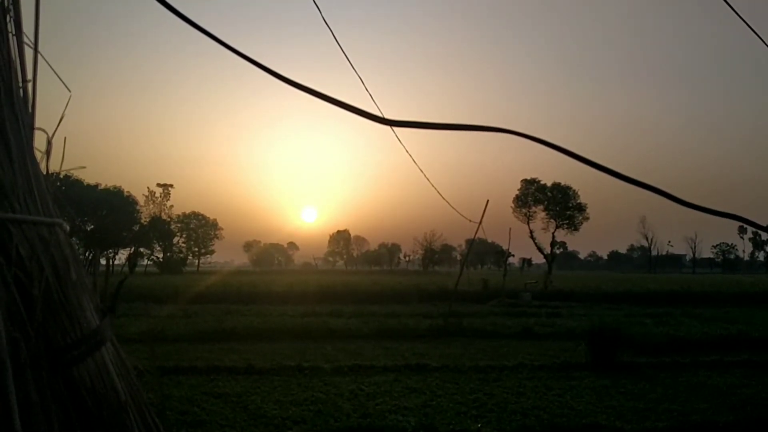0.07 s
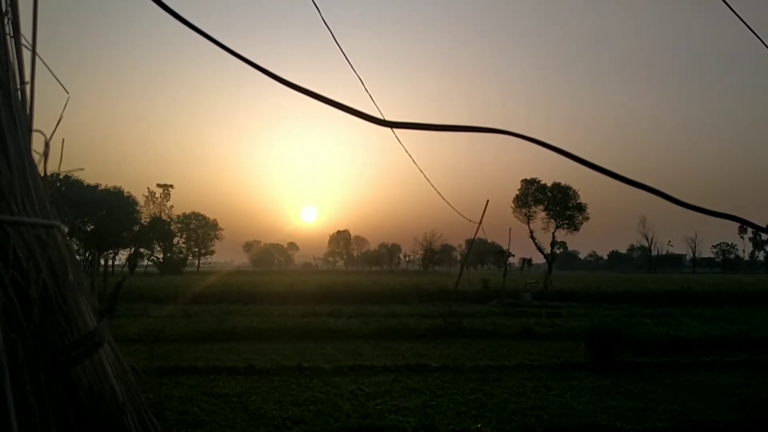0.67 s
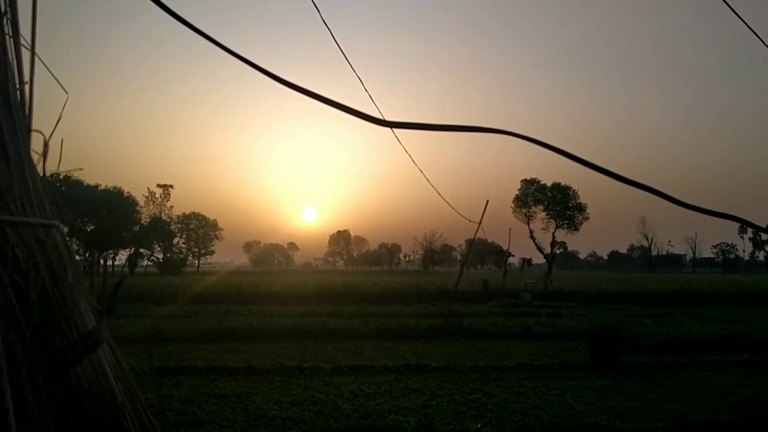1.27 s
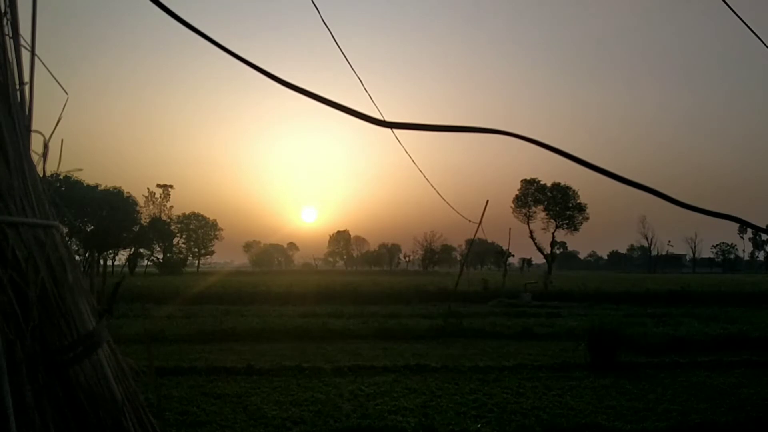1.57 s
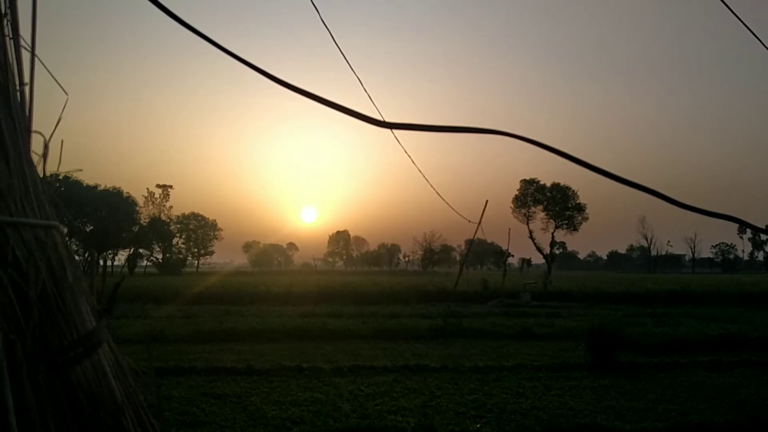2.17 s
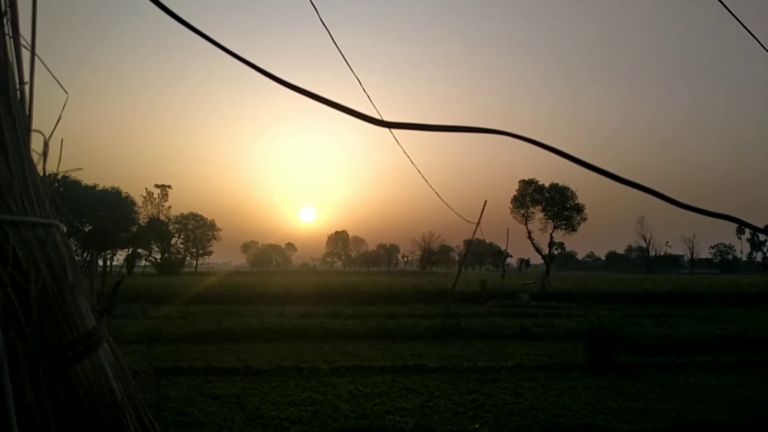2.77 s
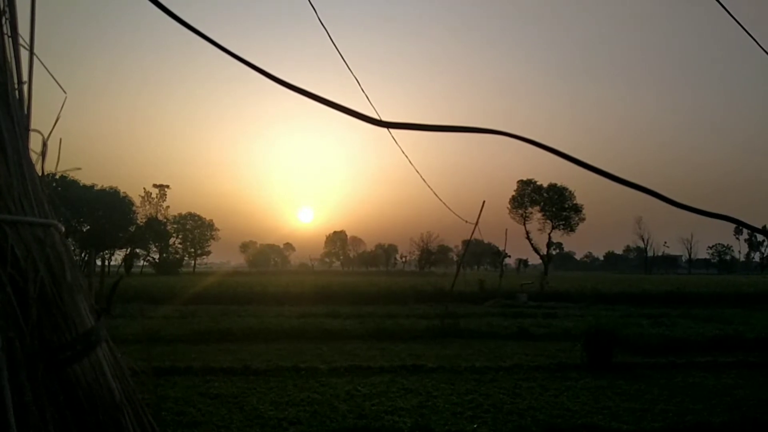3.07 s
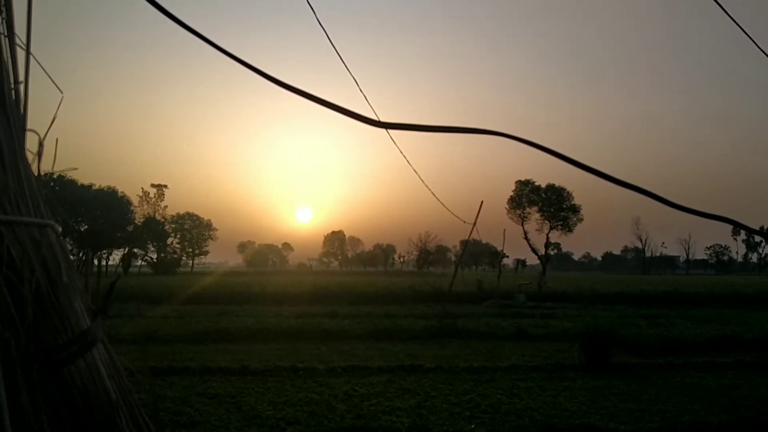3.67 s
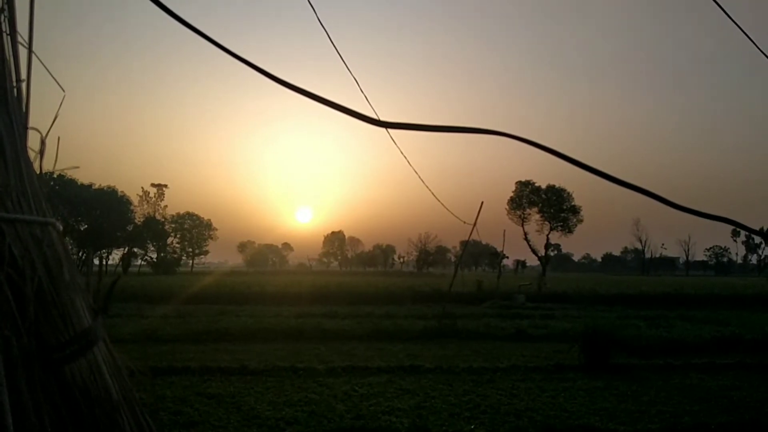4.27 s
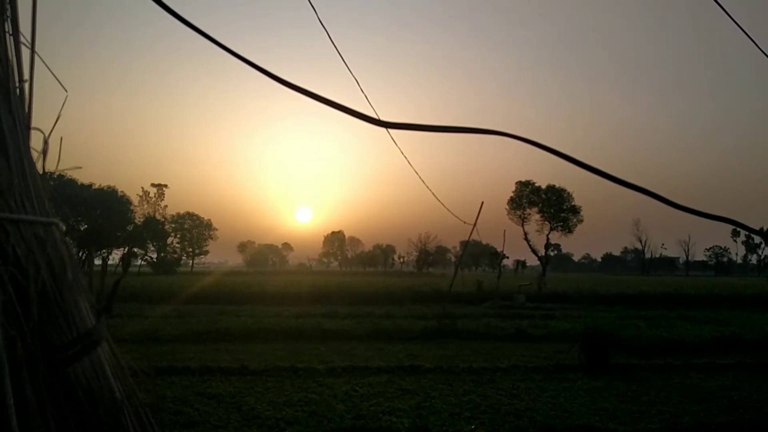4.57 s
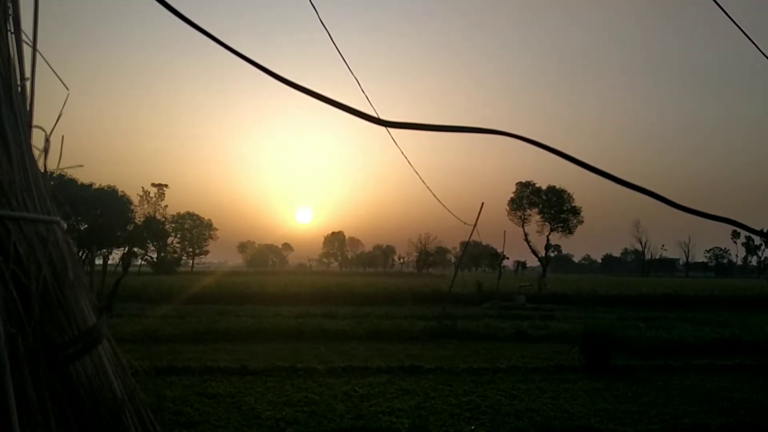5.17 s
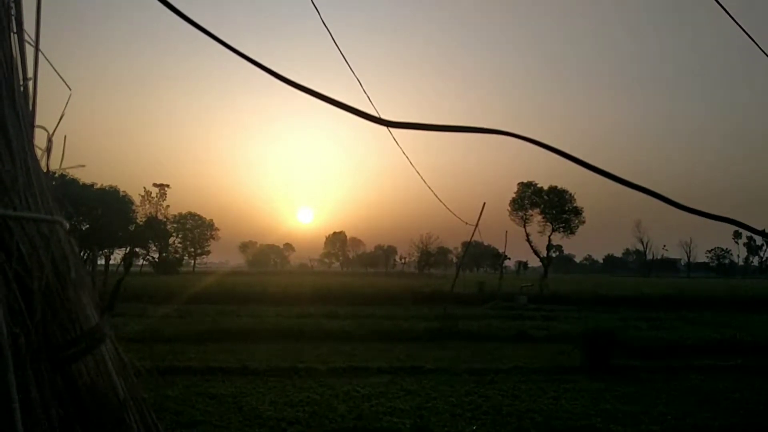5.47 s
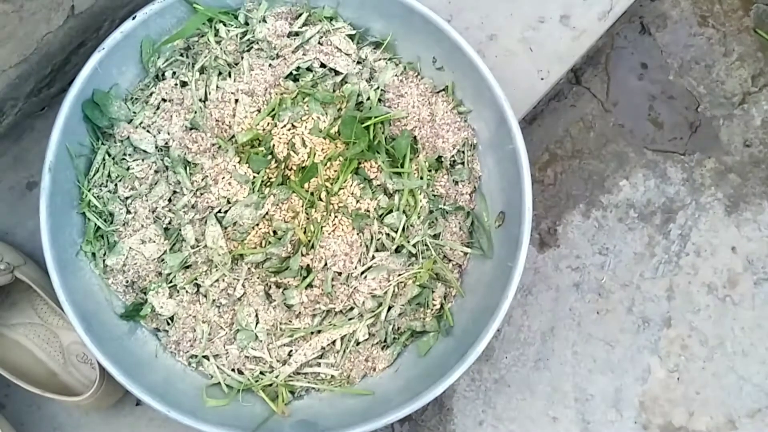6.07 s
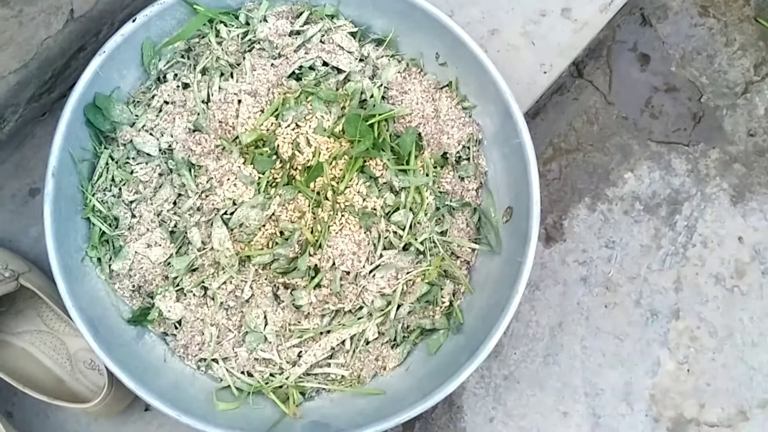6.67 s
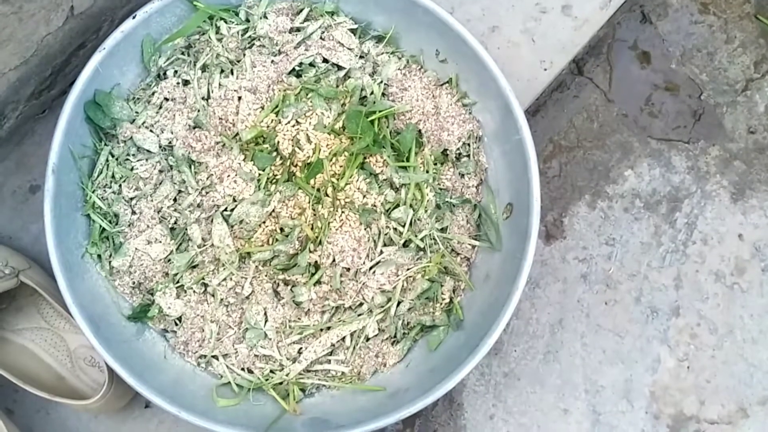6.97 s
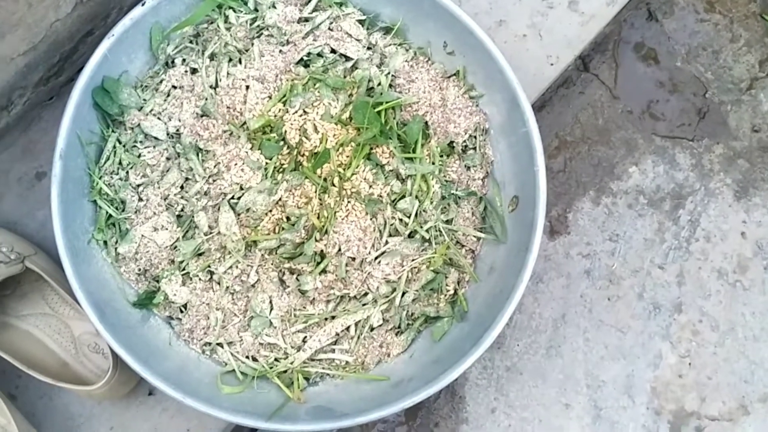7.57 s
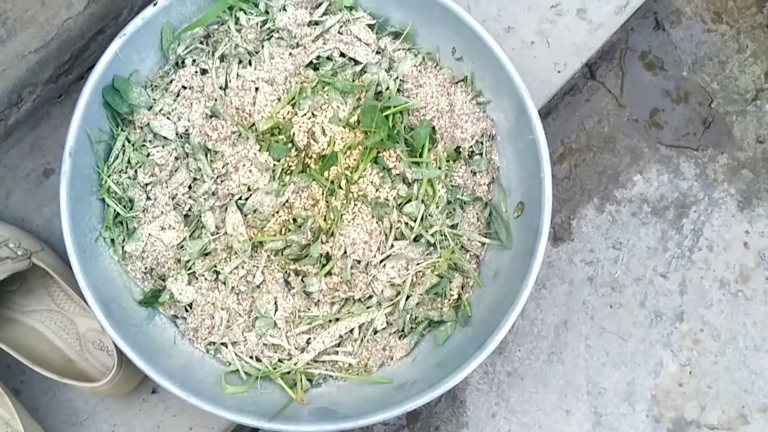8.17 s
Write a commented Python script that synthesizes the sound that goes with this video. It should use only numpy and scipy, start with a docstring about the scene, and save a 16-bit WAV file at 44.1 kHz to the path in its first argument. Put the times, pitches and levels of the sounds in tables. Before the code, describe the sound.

Birdsong and far crow caws in open air give way to close rustling of dry fibres and one loud scrape.

```python
"""Dawn over farmland: small birds whistle, chirp, pip and trill, mostly left of the microphone, while
crows caw far off over open air and a low rumble. From two seconds in come short swells of breathy hiss.
After a short silence the microphone stands in a yard, beside a basin of fodder: dry fibres slip and
buckle in soft rustles and one loud, close scrape, and a last crow calls in the distance.
Single ticks and bumps dot both places."""
import sys
import numpy as np
from scipy import signal
from scipy.fft import rfft, irfft, next_fast_len
from scipy.io import wavfile
from scipy.ndimage import uniform_filter1d

SR = 44100
rng = np.random.default_rng(int(sys.argv[2]) if len(sys.argv) > 2 else 0)


def transcribe(signal):
    """Save signal, clipped to [-1, 1], as a 16-bit WAV file at the path in sys.argv[1]."""
    frames = np.atleast_2d(signal).T
    limited = np.clip(frames, -1, 1)
    pcm = np.round(limited * 32767).astype(np.int16)
    wavfile.write(sys.argv[1], SR, pcm)


N = 371322
TIME = np.arange(N) / SR
FIELD_END_S, YARD_START_S = 5.33, 5.555
TOP_HZ = 15900


def whistles(waver=.004, flutter_db=0.5):
    """Clean gliding whistles from the left; the open beak lets overtones out."""
    # One list a whistle. Each row: time in seconds, pitch in Hz, levels of harmonics 1, 2 and 3 in dB.
    contours = [
        [(2.025, 2474, -62, -83.5, -95), (2.055, 2683, -51, -85, -90), (2.13, 2830, -46, -54, -83),
         (2.22, 3010, -58, -61, -96)],
        [(3.565, 2782, -41.5, -54, -51), (3.62, 2752, -41.5, -42.5, -39), (3.665, 2709, -38, -53.5, -34.5),
         (3.7, 2430, -39, -57.5, -53), (3.742, 2150, -49, -75, -80.5)],
        [(4.248, 2070, -47, -79, -68), (4.278, 2410, -50, -75, -74), (4.335, 2493, -47, -82.5, -71),
         (4.415, 2800, -43, -81, -83), (4.45, 2921, -43.5, -65, -83), (4.47, 2810, -50.5, -69.5, -85)],
        [(4.968, 2714, -57, -60, -65), (4.998, 3130, -46, -53.5, -66.5), (5.028, 3270, -36.5, -48, -69.5),
         (5.06, 3223, -46.5, -55.5, -71)],
    ]
    # Where each whistler sits. Each row: left minus right in dB, lag of the left ear in ms.
    perches = [(9.5, 0.26), (4.5, -.25), (10.5, -0.07), (10.5, -.02)]
    out = np.zeros((2, N))
    for contour, (pan_db, lag_ms) in zip(contours, perches):
        start, end = contour[0][0], contour[-1][0]
        t = start + clock(end - start)
        hz, *levels = curves(contour, t)
        phase = turn(hz * (1 + waver * wander(t, 300)))
        tone = sum(undb(db + flutter_db * wander(t, 120)) * np.sin(k * phase)
                   for k, db in enumerate(levels, 1))
        add(out, start, np.sqrt(2) * tone * signal.windows.tukey(len(t), .15), pan_db, lag_ms)
    return out


def chirp(length, hz, bend, rasp, taper=0.51, rasp_hz=330, rasp_db=5, overtone_db=-21):
    """One chirp bends from hz * bend[0] through hz to hz * bend[1]; rasp shakes its pitch and level."""
    t = clock(length)
    arc = np.polyfit([0, .5, 1], [bend[0], 1, bend[1]], 2)
    phase = turn(hz * np.polyval(arc, t / t[-1]) + rasp * rasp_hz * wander(t, 900))
    overtone = undb(overtone_db) / (1 + (hz / 4500) ** 8)  # the beak passes little treble
    tone = np.sin(phase) + overtone * np.sin(2 * phase)
    shake = undb(rasp * rasp_db * wander(t, 400))
    return unit(tone * shake) * signal.windows.tukey(len(t), taper)


def chirps():
    """Short calls around the field; each kind keeps its own shape."""
    # One bird's thin, high arches. Each row: start and length in seconds, level and left minus right in dB.
    tsees = [(0.092, 0.097, -66, 1), (0.69, 0.024, -66, -4), (1.059, 0.089, -63, 5),
             (1.179, 0.032, -62.5, -1), (1.759, 0.077, -65, 11.5), (2.206, 0.088, -59, 5.5),
             (3.39, 0.078, -54, 1.5)]
    # Clean, round arches. Each row: start and length in seconds, top pitch in Hz,
    # level and left minus right in dB.
    arches = [(3.574, .06, 4530, -52, 8), (3.724, 0.056, 4520, -59, 15), (4.987, .065, 4010, -48, 14.5)]
    # Harsh downward swoops. Each row: start and length in seconds, level in dB.
    swoops = [(3.532, 0.088, -47), (3.938, .125, -49.5)]
    # Other birds' plain slurs. Each row: start and length in seconds, pitch in Hz, glide in octaves,
    # level in dB, rasp from 0 to 1, left minus right in dB.
    slurs = [(.55, 0.093, 2240, -0.1, -72, .1, 2), (0.804, 0.15, 2090, -0.38, -76.5, 0.16, -1),
             (0.919, 0.124, 2004, .14, -69, 0.16, 6), (1.671, 0.096, 2880, -0.28, -64.5, 0.52, 13.5),
             (1.938, .018, 2170, -0.47, -65, 0.15, 1), (2.274, 0.077, 3094, -0.02, -52, 0.5, 6),
             (2.7, 0.032, 3250, 0, -60.5, 0.16, 7.5), (2.718, 0.03, 4220, -0.42, -58.5, 0.81, 15),
             (2.928, .096, 2840, 0, -67, 0.09, 8.5), (3.352, 0.058, 2830, 0, -46.5, .6, 7),
             (3.39, 0.12, 2700, 0.33, -52.5, 1, 6), (3.765, 0.13, 4420, 0, -62, 0.18, 11),
             (3.905, 0.054, 4674, 1.7, -50, 0.99, 5.5), (3.965, 0.0527, 7600, -.2, -53, .9, 4.5),
             (4.085, 0.22, 3684, 0.25, -59.5, 0.18, 5), (4.848, 0.12, 2050, .1, -63.5, 0.27, 8),
             (5.046, .07, 2885, -0.24, -50.5, .4, 11), (5.096, 0.031, 2528, -0.55, -52.5, 0.45, 10)]
    out = np.zeros((2, N))
    for start, length, db, pan_db in tsees:
        add(out, start, undb(db) * chirp(length, hz=6280, bend=(.78, .89), rasp=.75), pan_db)
    for start, length, hz, db, pan_db in arches:
        add(out, start, undb(db) * chirp(length, hz, bend=(.68, .7), rasp=.1), pan_db)
    for start, length, db in swoops:
        add(out, start, undb(db) * chirp(length, hz=3730, bend=(2.1, .62), rasp=1.1), pan_db=8)
    for start, length, hz, glide, db, rasp, pan_db in slurs:
        bend = 2 ** (-glide / 2), 2 ** (glide / 2)
        add(out, start, undb(db) * chirp(length, hz, bend, rasp), pan_db)
    return out


def trills(overtone_db=-15, flutter_db=3.5, settle_power=2.5):
    """Chains of arched syllables; as the bird's effort ebbs they slow down and fall in pitch."""
    # Each row: start, length and settling time in seconds, first and last syllables per second,
    # first and last low note in Hz, arch height in Hz, place of the crest in a syllable from 0 to 1,
    # crest against low note in dB, level in dB, fade in dB per second, left minus right in dB.
    chains = [(4.466, .385, .085, 59.3, 26.63, 6490, 2976, 1076, 0.75, -6.5, -34.5, 21, 6.2),
              (5.2603, 0.067, 0.03, 113, 101.2, 3575, 2806, 1840, 0.5, 5, -44.5, -23, 6.7)]
    out = np.zeros((2, N))
    for (start, length, settle, first_rate, last_rate, first_hz, last_hz,
         arch_hz, crest, crest_db, db, fade_db, pan_db) in chains:
        t = clock(length)
        effort = 1 / (1 + (t / settle) ** settle_power)
        cycle = np.cumsum(last_rate + (first_rate - last_rate) * effort) / SR % 1
        ramp = np.interp(cycle, [0, np.clip(crest, .2, .9), 1], [0, 1, 0])
        arch = np.sin(np.pi / 2 * ramp) ** 2
        hz = last_hz + (first_hz - last_hz) * effort + arch_hz * arch
        phase = turn(hz * (1 + .012 * wander(t, 900)))
        overtone = undb(overtone_db) / (1 + (hz / 4200) ** 20)  # the beak passes little treble
        tone = unit(np.sin(phase) + overtone * np.sin(2 * phase))
        loudness = undb(db - fade_db * t + crest_db * arch + flutter_db * wander(t, 550))
        add(out, start, tone * loudness * signal.windows.tukey(len(t), .04), pan_db, lag_ms=-.09)
    return out


def pips(pan_db=11.5, duty=.72, swell_db=8):
    """Quick runs of evenly spaced little hooks, loudest in the middle of a run."""
    # Each row: start and length in seconds, pips per second, pitch in Hz, climb over the run in octaves,
    # start and end of a pip as shares of its pitch, mid-run level in dB.
    runs = [(3.174, .21, 28.55, 2840, 0.0082, 0.87, 0.8, -46.5),
            (3.311, .18, 66.6, 2075, 0.3, 0.93, 0.97, -48.5),
            (3.836, 0.19, 30.85, 3070, 0, .78, 0.99, -45.5)]
    out = np.zeros((2, N))
    for start, length, rate, hz, climb, first, last, db in runs:
        for k, place in enumerate(np.linspace(-1, 1, round(length * rate))):
            pip = chirp(duty / rate, hz * 2 ** (climb * place / 2), (first, last), rasp=.088, taper=.41)
            add(out, start + k / rate, undb(db - swell_db * place ** 2) * pip, pan_db)
    return out


def rustles(catch_db=1.0, crackle_db=-13, low_air_db=-50, low_air_growth=0.21):
    """Handled fibres slip: a bright, crackly rustle, and a duller scrape when pressed hard."""
    # Each row: start, rise, hold and fade to -60 dB in seconds, level in dB, scrape against it in dB.
    strokes = [(5.705, 0.0058, 0.049, 0.36, -46.5, -6.5), (5.84, 0.006, 0.087, 0.28, -54.5, -3),
               (6.037, 0.066, 0.0085, 0.21, -57.5, -3), (6.108, 0.0021, 0.031, 0.17, -46.5, -10.5),
               (6.24, 0.0137, 0.0095, 0.25, -70, -6), (6.414, 0.013, 0.0045, 0.08, -31, -1),
               (6.431, 0.0073, .02, 1.1342, -40, -12), (6.525, 0.0037, 0.03, 0.65, -36, -11),
               (6.552, 0.03355, 0.021, 0.1537, -18.5, 0), (6.635, 0.062, 0.045, 0.2782, -34.5, -17),
               (6.869, 0.012, .019, 0.57, -61.5, -1.5), (7.103, 0.00595, 0.024, 0.25, -53, -7),
               (7.211, 0.00386, 0.0072, 0.13, -57, -16), (7.315, 0.03, 0.045, 0.33, -51.5, -7.5),
               (7.607, 0.0078, .005, 0.33, -59, 2.5), (7.748, 0.012, 0.0136, 0.236, -61.5, -5),
               (7.943, 0.0436, 0.19, 0.4, -57.5, -6), (8.042, .0036, 0.039, 0.08, -50.5, -3.5)]
    # Spectra of rustle, scrape and low air. Each row: frequency in Hz, relative level in dB.
    rustle_colour = [(88, -48.5), (150, -23.5), (341, -16.5), (398, -13), (1120, -14.5), (2400, -8),
                     (3160, -8.5), (3920, -4), (5790, 0), (8560, 1.5), (11500, -10), (14000, -6),
                     (16000, -20)]
    scrape_colour = [(150, -31.5), (500, -13.5), (1000, -7.5), (1400, -2.5), (2200, 0), (3600, 1.5),
                     (5000, -9), (14000, -28.5)]
    low_air_colour = [(25, -9.5), (90, -1), (200, -6), (350, -3), (450, -7.5), (620, -1), (850, -12.5),
                      (1500, -27.5), (4000, -44)]
    bright, dull, low = np.zeros((3, 2, N))
    for start, rise, hold, fade, db, scrape_db in strokes:
        add(bright, start, undb(db) * swell(rise, hold, fade), pan_db=1)
        add(dull, start - .003, undb(db + scrape_db) * swell(rise, hold, fade * 0.93), pan_db=1)
        # Low background air swells up with each rustle, only a little more for a loud one.
        add(low, start, undb(low_air_db + low_air_growth * db) * swell(rise, hold, fade * 1.2), pan_db=.5)
    fibres = grainy_hiss(rustle_colour, rate=3200, spread_db=3.5, smooth=3.7)
    crackle = undb(crackle_db) * crinkles()
    scrape = grainy_hiss(scrape_colour, rate=1500, spread_db=3, smooth=.9)
    catching = undb(catch_db * wander(TIME, 170))
    low_air = low * air(low_air_colour, flicker_db=4.5)
    return (bright * (fibres + crackle) + dull * scrape) * catching + low_air


def swell(rise, hold, fade):
    """A level that builds, holds and dies away."""
    rise, hold, fade = np.maximum([rise, hold, fade], [.001, 0, .03])
    t = clock(rise + hold + fade)
    return np.minimum(t / rise, 1) ** 1.2 * undb(-60 * np.maximum(t - rise - hold, 0) / fade)


def grainy_hiss(points, rate, spread_db, smooth):
    """Countless tiny clicks, a few larger than the rest, over a smooth hiss."""
    clicks = (rng.random(N) < rate / SR) * rng.choice([-1, 1], N)
    clicks = clicks * undb(spread_db * np.minimum(rng.exponential(size=N), 2))
    both = np.array([np.roll(clicks, 20), clicks])  # they reach the right ear first
    return colour(unit(both) + smooth * stereo_noise(), points)


def crinkles(count=1200, low_hz=3000, high_hz=12000, cycles=6):
    """Single fibres buckling: tiny ticks, each with its own pitch, size and direction."""
    out = np.zeros((2, N))
    span = TIME[-1] - .01 - YARD_START_S
    for when, height, size, side in rng.random((count, 4)):
        hz = low_hz * (high_hz / low_hz) ** height
        t = clock(cycles / hz)
        tick = np.sin(2 * np.pi * hz * t) * undb(-60 * t * hz / cycles + 16 * size ** 3)
        add(out, YARD_START_S + when * span, tick, pan_db=6 * side - 2, lag_ms=side - .3)
    return unit(out)


def snaps(cycles=6, width=0.65):
    """Single ticks and soft bumps in both places; the lower ones last longer."""
    # Each row: start in seconds, level in dB, centre in Hz.
    ticks = [(2.183, -40.5, 7000), (4.026, -25.5, 1380), (4.661, -36, 397), (5.244, -38, 401),
             (5.709, -30.5, 6000), (5.846, -34, 2800), (5.893, -37, 6100), (5.969, -37.5, 6100),
             (6.109, -34, 6800), (6.425, -15.5, 2480), (6.523, -20, 7250), (6.569, -12, 2600),
             (6.81, -37.5, 480), (7.216, -38, 6370)]
    out, t = np.zeros((2, N)), clock(.06)
    for start, db, hz in ticks:
        burst = rng.standard_normal((2, len(t)))
        ring = unit(resonate(burst, hz, hz * width))
        add(out, start, undb(db) * ring * undb(-60 * t / (0.0026 + cycles / hz)))
    return out


def hiss_swells(flicker_db=2.5):
    """Short swells of breathy hiss, about four a second; the last one lingers."""
    # Each row: start, rise, hold and fade to -60 dB in seconds, level in dB.
    swells = [(2.048, 0.061, 0.044, 0.42, -49.5), (2.299, 0.0027, 0.0096, 0.36, -45.5),
              (2.539, 0.013, 0.024, 0.39, -45), (2.792, 0.014, 0.0406, 0.26, -42.5),
              (3.083, 0.0045, 0.029, 0.2, -41), (3.354, .02, 0.039, 3.3, -49.5)]
    # Their spectrum. Each row: frequency in Hz, relative level in dB.
    hiss_colour = [(150, -6.5), (490, -17.5), (1100, -3), (1500, -9), (2300, -2.5), (3300, 0), (4400, -9),
                   (7100, -2), (8400, -8), (9600, -61.5), (15000, -26)]
    level = np.zeros((2, N))
    for start, rise, hold, fade, db in swells:
        add(level, start, undb(db) * swell(rise, hold, fade), pan_db=2.2)
    flicker = undb(flicker_db * wander(TIME, 160))
    return level * flicker * grainy_hiss(hiss_colour, rate=3000, spread_db=4, smooth=2.5)


def crows(hoarse=0.0903, throat_hz=1730, throat_width_hz=430, chest_hz=600, between_hz=1130):
    """Far crows: uneven pulses through the throat; distance leaves mostly its nasal resonance."""
    # Each row: start and length in seconds, pitch in Hz, level in dB, weight of the low resonances in dB.
    caws = [(0.154, 0.2, 434, -59.5, -12), (0.606, 0.14, 446, -62, -23), (1.045, 0.21, 426, -61, -12),
            (3.519, 0.15, 565, -53, 4.5), (4.082, 0.17, 455.4, -54.5, -21), (4.494, .2, 567, -49.5, 2.5),
            (4.721, .14, 579, -56.5, 5.5), (7.951, .27, 517, -62.5, -7.5)]
    out = np.zeros((2, N))
    for start, length, hz, db, low_db in caws:
        t = clock(length)
        sag = 1.04 - .08 * t / t[-1] + .025 * wander(t, 40)
        phase = turn(hz * sag * (1 + hoarse * wander(t, 700)))
        pulses = sum(np.cos(k * phase) for k in range(1, 7))
        pulses *= undb(8.3 * np.tanh(wander(t, 600)))
        nasal = resonate(resonate(pulses, throat_hz, throat_width_hz), throat_hz, throat_width_hz)
        low = resonate(pulses, chest_hz, 120) + undb(-3) * resonate(pulses, between_hz, 200)
        caw = unit(nasal + undb(low_db - 2.5) * low) * signal.windows.tukey(len(t), .35)
        add(out, start, undb(db) * caw, pan_db=5, lag_ms=.02)
    return out


def flock(count=260, db=-8, spread_db=3, low_hz=2000, high_hz=6000, slide=0.25):
    """Many faint, far chirps, each with its own pitch, slide and direction."""
    out = np.zeros((2, N))
    for when, height, length, bend, size, side in rng.random((count, 6)):
        t = clock(.012 + 0.046 * length)
        glide = 1 + slide * (2 * bend - 1.3) * t / t[-1]
        hz = low_hz * (high_hz / low_hz) ** (height ** 2) * glide
        tone = np.sin(turn(hz * (1 + 0.043 * wander(t, 700)))) * np.hanning(len(t))
        add(out, when * FIELD_END_S, undb(db + spread_db * (2 * size + 1)) * tone, pan_db=8 * side - 2)
    return out


def outdoors(x, near_db=-7, near_t60=0.22, far_db=-17, far_t60=0.53, echo_db=-13, echo_s=0.011):
    """Ground and walls scatter the calls quickly, trees add a faint long tail."""
    t = clock(.8)
    near, far = (rng.standard_normal((2, len(t))) * undb(-60 * t / t60) * (t > .003)
                 for t60 in (near_t60, far_t60))
    far = signal.lfilter(*signal.butter(2, 4500, fs=SR), far)  # foliage soaks up the treble
    response = (undb(near_db) * unit(near) + undb(far_db) * unit(far)) / np.sqrt(len(t))
    out = x + signal.fftconvolve(x, response, axes=1)[:, :N]
    add(out, echo_s, undb(echo_db) * x[::-1], lag_ms=-.3)  # one echo from the opposite side
    return out


def air(points, flicker_db):
    """Coloured noise whose level flickers."""
    return colour(stereo_noise(), points) * undb(flicker_db * wander(TIME, 25))


def stereo_noise(split_hz=550):
    """Noise that is alike in both ears in the bass and nearly unrelated in the treble."""
    mid, side = rng.standard_normal((2, N))
    side = .25 * side + .6 * signal.lfilter(*signal.butter(1, split_hz, "high", fs=SR), side)
    return np.array([np.roll(mid + side, 18), mid - side]) / np.sqrt(2)  # it reaches the right ear first


def suppress(sounds, background, threshold_db, depth_db, knee_db=3.5, window_s=0.0298):
    """The phone's noise suppressor turns the background down when the sounds over it grow quiet."""
    power = uniform_filter1d(np.mean(sounds ** 2, axis=0), int(window_s * SR))
    over_db = 10 * np.log10(np.maximum(power, 1e-14)) - threshold_db
    shut = (1 - np.tanh(over_db / (2 * knee_db))) / 2
    return sounds + background * undb(-depth_db * shut)


def undb(db):
    """Decibels to gain."""
    return 10 ** (np.asarray(db) / 20)


def unit(x):
    """Scale to rms 1."""
    return x / (np.sqrt(np.mean(x ** 2)) + 1e-12)


def curves(table, t):
    """The columns of a table, joined by straight lines."""
    times, *columns = np.transpose(table)
    return [np.interp(t, times, column) for column in columns]


def clock(length):
    """Sample times of one event."""
    return np.arange(max(int(length * SR), 64)) / SR


def colour(x, points):
    """Filter by a spectrum of (Hz, dB) points and scale to rms 1."""
    hz, db = np.transpose(points)
    size = next_fast_len(x.shape[-1])
    bins_hz = np.maximum(np.fft.rfftfreq(size, 1 / SR), 1)
    gain = undb(np.interp(np.log(bins_hz), np.log(hz), db))
    return unit(irfft(rfft(x, size) * gain, size)[..., :x.shape[-1]])


def resonate(x, hz, width_hz):
    """One resonance, gain 1 at its centre."""
    return signal.lfilter(*signal.iirpeak(hz, hz / width_hz, fs=SR), x)


def wander(t, rate):
    """Smooth chance that changes about rate times a second."""
    return np.interp((t - t[0]) * rate, np.arange(8192), rng.standard_normal(8192))


def turn(hz):
    """Phase of a gliding tone."""
    return 2 * np.pi * np.cumsum(hz) / SR


def add(out, start, x, pan_db=0, lag_ms=0):
    """Mix a sound in; positive pan_db favours the left ear, positive lag_ms makes it the later one."""
    for ear, side, sound in zip(out, (1, -1), np.broadcast_to(x, (2, x.shape[-1]))):
        i = max(int(start * SR + side * lag_ms * SR / 2000), 0)
        ear[i:i + len(sound)] += sound[:N - i] * undb(side * pan_db / 2)


def field(hiss_db=4, flock_db=-1.0):
    """Birds and swells of hiss over open air and a far rumble; trills and pips come from nearest."""
    # Swell of the whole background. Each row: time in seconds, gain in dB.
    air_levels = [(0, -61.5), (2.2, -62), (3.4, -60), (4.5, -57.5), (4.95, -59), (5.3, -55.5)]
    # The rumble within it. Each row: time in seconds, relative level in dB.
    rumble_levels = [(0, 4), (3, -0.5), (3.7, -0.5), (4.35, 5.5), (4.75, -0.5), (5.3, 1)]
    # Spectra of open air and rumble. Each row: frequency in Hz, relative level in dB.
    air_colour = [(59, -28), (100, -8), (156, -9.5), (283, -12), (502, -14.5), (595, -12), (1010, -18.5),
                  (1080, -20), (1390, -18.5), (1610, -17), (2800, -19), (6020, -22), (10000, -37),
                  (16000, -36)]
    rumble_colour = [(20, -25.5), (45, -21.5), (64, 6.5), (76, -2), (97, -6), (130, -19.5), (250, -53)]
    air_db, rumble_db = curves(air_levels, TIME)[0], curves(rumble_levels, TIME)[0]
    birds = outdoors(whistles() + chirps() + crows())
    birds += outdoors(trills() + pips(), near_db=-10.5, near_t60=0.18, far_db=-17.5, echo_db=-23)
    background = undb(hiss_db) * air(air_colour, flicker_db=3.0)
    background += undb(rumble_db) * air(rumble_colour, flicker_db=2.0)
    background += undb(flock_db) * outdoors(flock())
    return suppress(birds + hiss_swells(), undb(air_db) * background, threshold_db=-62, depth_db=12)


def yard(air_db=-62):
    """Rustles close to the microphone, a crow far off and quiet air behind them."""
    # Spectrum of the yard's air. Each row: frequency in Hz, relative level in dB.
    air_colour = [(20, -18.5), (50, -5.5), (95, 1), (200, -6), (400, -9.5), (600, -13), (900, -19),
                  (2200, -16.5), (4000, -24), (8000, -23.5), (16000, -36.5)]
    sounds = rustles() + outdoors(crows(hoarse=0.103, throat_hz=1880, throat_width_hz=450))
    background = undb(air_db) * air(air_colour, flicker_db=2.5)
    return suppress(sounds, background, threshold_db=-58, depth_db=8)


def scene(fade_s=0.19):
    """The field, a moment of silence, then the yard fades in."""
    fade_in = np.clip((TIME - YARD_START_S) / fade_s, 0, 1) ** .5
    return yard() * fade_in + field() * (TIME < FIELD_END_S) + snaps()


def record(dry):
    """The phone rounds the loudest peaks and cuts the top."""
    rounded = .7 * np.tanh(dry / .7)
    return signal.sosfilt(signal.ellip(10, .2, 80, TOP_HZ, fs=SR, output="sos"), rounded)


dry = scene()
out = record(dry)
transcribe(out)
```